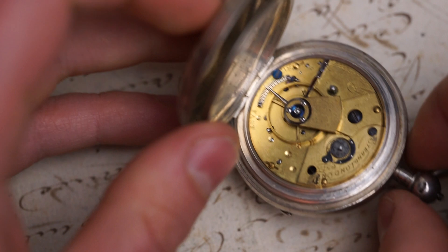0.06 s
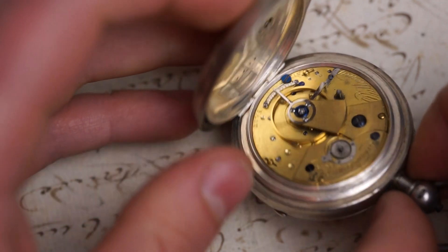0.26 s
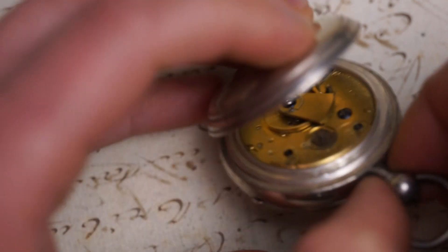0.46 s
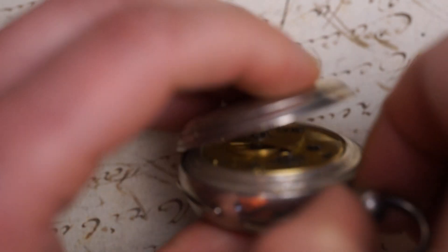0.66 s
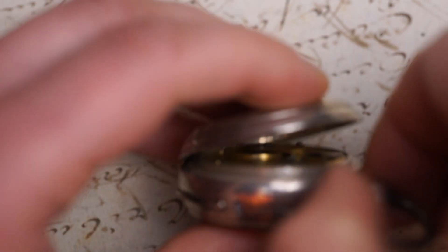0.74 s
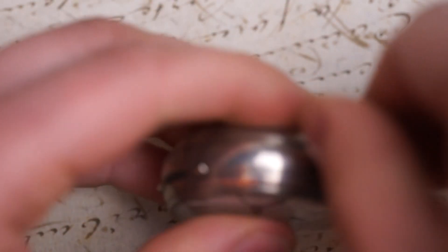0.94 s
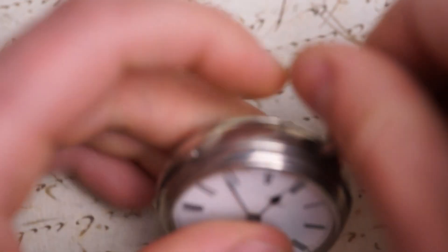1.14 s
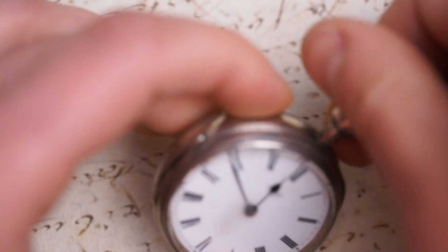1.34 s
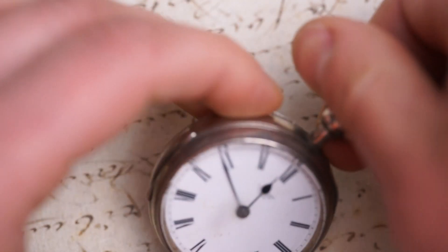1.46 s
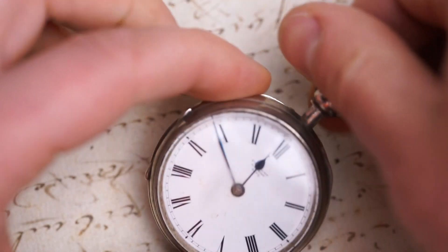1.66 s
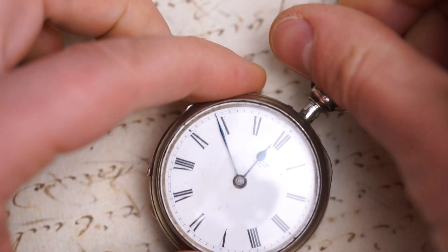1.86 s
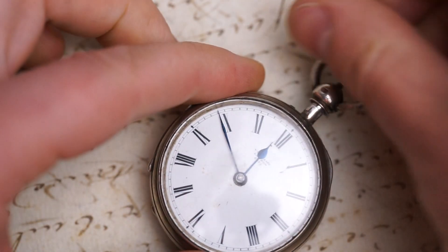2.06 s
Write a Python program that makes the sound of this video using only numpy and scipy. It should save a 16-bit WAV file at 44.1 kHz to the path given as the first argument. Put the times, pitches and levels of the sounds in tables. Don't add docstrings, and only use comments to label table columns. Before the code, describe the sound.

A metal pocket watch handled up close: one loud, bright lid snap with a short ring, then a lighter knock, a duller shutting click, and faint finger rubs and ticking in a quiet room.

```python
import sys
import numpy as np
from scipy import signal
from scipy.io import wavfile

SR = 44100
rng = np.random.default_rng(int(sys.argv[2]) if len(sys.argv) > 2 else 0)


def volts_from_decibels(level):
    exponent = np.asarray(level, float) / 20
    return 10 ** exponent


def master_out(mix):
    frames = np.transpose(np.atleast_2d(mix))
    ceiling = np.clip(frames, -1, 1)
    pcm = np.round(ceiling * 32767).astype(np.int16)
    wavfile.write(sys.argv[1], SR, pcm)


N = 92610


def rms_one(x):
    return x / np.sqrt(np.mean(x ** 2) + 1e-20)


def at_hz(points, hz):
    table_hz, values = np.array(points).T
    return np.interp(np.log(hz), np.log(table_hz), values)


def ring(push, hz, t60):
    radius = volts_from_decibels(-60 / (t60 * SR))
    angle = 2 * np.pi * hz / SR
    return signal.lfilter([0, np.sin(angle)], [1, -2 * radius * np.cos(angle), radius * radius], push + 1e-18)


def band(x, hz, octaves):
    edges = np.clip([hz * 2 ** (-octaves / 2), hz * 2 ** (octaves / 2)], 10, 0.45 * SR)
    return signal.sosfilt(signal.butter(2, edges, "band", fs=SR, output="sos"), x)


def add(out, start_s, sound, pan_db=0.0):
    first = int(start_s * SR)
    out[:, first:first + len(sound)] += volts_from_decibels([[pan_db / 2], [-pan_db / 2]]) * sound


# pitch_hz, likeness
LIKENESS_BY_HZ = [(30, 1), (125, 0.97), (290, 0.86), (640, 0.26), (1500, 0.12), (5000, 0.062),
                  (12000, 0.094)]


def noise_bands(gain_at):
    settle = 8000
    white = rng.standard_normal((2, 2, N + settle))
    edges = 16 * 2 ** np.arange(0, 10.3, 0.5)
    out = 0
    for k, low in enumerate(edges[:-1]):
        hz = low * 2 ** 0.25
        mid, side = band(white[k % 2], hz, 0.5)[:, settle:]
        alike = np.clip(at_hz(LIKENESS_BY_HZ, hz), -1, 1)
        stereo = np.sqrt(1 + alike) * mid + np.sqrt(1 - alike) * side * [[1], [-1]]
        out = out + gain_at(hz) * stereo
    return out


# pitch_hz, level_db
HISS_SPECTRUM = [(20, -13), (42, -8), (62, -10), (100, -5), (170, -11.5), (330, -11.5), (800, -20.5),
                 (2000, -23)]


def hiss():
    level_db, tilt_db_per_octave = -57.5, -2.07
    top_hz = HISS_SPECTRUM[-1][0]

    def gain_at(hz):
        octaves_above = max(0, np.log2(hz / top_hz))
        return volts_from_decibels(at_hz(HISS_SPECTRUM, hz) + tilt_db_per_octave * octaves_above)

    return volts_from_decibels(level_db) * rms_one(noise_bands(gain_at))


# middle_s, half_length_s, level_db, centre_hz, width_octaves
RUB_EVENTS = [
    (0.13, 0.079, -65.5, 1800, 2.3),
    (0.53, 0.047, -59.5, 1600, 3),
    (0.74, 0.058, -62, 7700, 3.8),
    (1.21, 0.041, -54, 4200, 2.24),
    (1.1, 0.013, -63.5, 7300, 1.8),
    (1.207, .04, -55.5, 11000, 1.1),
    (0.74, 0.025, -61, 1500, 0.55),
    (1.447, 0.036, -64.5, 6700, 1.75),
    (1.962, 0.044, -66, 6700, 1.1),
]


def rubs():
    grains_per_s = 4200
    t = np.arange(N) / SR
    out = np.zeros((2, N))
    for middle_s, half_s, db, hz, octaves in RUB_EVENTS:
        noise = rng.standard_normal((2, N))
        strength = volts_from_decibels(0.51 * np.minimum(rng.exponential(1, N), 3))
        slips = rng.random(N) < grains_per_s / SR
        grains = noise * (0.35 + strength * slips)
        grains = grains + 0.27 * grains.sum(axis=0)
        swell = np.exp(-((t - middle_s) / half_s) ** 2)
        out += volts_from_decibels(db) * rms_one(band(grains, hz, octaves)) * swell
    return out


# start_s, level_db, pitch_hz, t60_s
THUMP_EVENTS = [(0.077, -36, 110.5, 0.076), (0.169, -36.5, 120.8, 0.25), (0.189, -48.5, 245, 0.16),
                (0.212, -42.5, 131.3, 0.66), (.29, -34, 127.7, 0.13), (0.459, -48.5, 121.4, 0.35),
                (0.528, -42, 129, 0.093), (.945, -51.5, 104, 0.25), (1.1, -56, 103.7, 0.91),
                (1.361, -43, 100.7, 0.14), (1.671, -33.5, 121, 0.14), (1.937, -39, 127.6, 0.13),
                (2.051, -40.5, 118, 0.11)]


def thumps():
    rise_s = 0.019
    out, t = np.zeros((2, N + SR)), np.arange(SR // 2) / SR
    for start_s, db, hz, t60 in THUMP_EVENTS:
        envelope = volts_from_decibels(db - 60 * t / t60) * (1 - np.exp(-t / rise_s))
        add(out, start_s, envelope * np.sin(2 * np.pi * hz * t))
    return out[:, :N]


# start_s, level_db, centre_hz,
# fall_s
TICK_EVENTS = [(0.098, -51.5, 8000, 0.0036), (0.204, -34, 11500, .003), (.2040, -25, 6300, .003),
               (0.6568, -43.5, 10400, .003), (0.956, -44, 11000, .002), (0.378, -47, 5600, 0.0027),
               (.42, -48.5, 3960, 0.0015), (0.4791, -48, 7500, 0.0074), (0.479, -48, 12500, 0.0038),
               (.496, -51, 1780, 0.018), (0.516, -50, 2030, 0.0087), (0.543, -60, 3000, 0.0023),
               (.7502, -52, 6800, 0.0046), (.772, -52, 5500, .004), (.777, -52, 14000, .004),
               (.775, -52.5, 8800, .004), (.897, -55, 9000, 0.003), (1.157, -47, 6470, 0.0016),
               (1.173, -43, 4900, 0.0038), (1.1873, -34.5, 6000, 0.00047), (1.265, -50, 11000, 0.0042),
               (1.296, -54, 10000, 0.0049), (1.4791, -50, 7800, 0.0046), (1.4793, -53, 13200, 0.0025),
               (1.564, -53, 14000, 0.004), (1.707, -56.5, 2520, 0.0033), (1.764, -48.5, 10000, 0.0028),
               (1.897, -54, 4600, 0.0022), (1.897, -55, 10000, .002), (1.922, -50.5, 4500, 0.0025),
               (1.965, -51, 13500, 0.003), (2.098, -53, 10900, .003)]


def ticks():
    out, t = np.zeros((2, N + SR)), np.arange(1500) / SR
    for start_s, db, hz, fall_s in TICK_EVENTS:
        burst = rng.standard_normal(len(t)) * np.exp(-t / fall_s)
        sound = band(burst, hz, octaves=0.83)
        add(out, start_s, volts_from_decibels(db) * sound / np.abs(sound).max(), pan_db=-6)
    return out[:, :N]


# start_s, level_db, free_ring_share
BEAT_EVENTS = [
    (0.1585, -48, .6),
    (0.402, -51, 0.9),
    (0.657, -58, .9),
    (0.9103, -49, 0.93),
    (1.165, -58, .6),
    (1.4203, -50, .7),
    (1.694, -55, .45),
    (1.93, -52, .45),
]
# delay_s, level_db
BEAT_CONTACTS = [
    (0, -5.5),
    (.0035, -8),
    (.009, -14),
    (.019, -17),
]
# pitch_hz, level_db, t60_s
MOVEMENT_MODES = [(4400, -18, 0.096), (5600, -9, 0.066), (6800, -13, .03), (7800, -9, 0.04),
                  (8400, -16, 0.046), (9100, -13, 0.048), (9800, -10, 0.12), (9500, -3, 0.05),
                  (10400, -16, 0.04), (11070, -2.5, 0.083), (11500, -13, .05), (12300, -13, .03),
                  (13000, -10, .04)]


def escapement():
    grit_fall_s, grit_level, shade_db = 0.002, 0.13, 2.5
    out, t = np.zeros((2, N + SR)), np.arange(6000) / SR
    for start_s, beat_db, free in BEAT_EVENTS:
        for delay_s, contact_db in BEAT_CONTACTS:
            shades = rng.standard_normal(len(MOVEMENT_MODES))
            signs = rng.choice([-1, 1], len(MOVEMENT_MODES))
            grit = grit_level * rng.standard_normal(len(t)) * np.exp(-t / grit_fall_s)
            push = 0.5 * (t == 0) + grit
            rings = 0
            for (hz, mode_db, t60), shade, sign in zip(MOVEMENT_MODES, shades, signs):
                rings = rings + sign * volts_from_decibels(mode_db + shade_db * shade) * ring(push, hz, free * t60)
            crack = volts_from_decibels(21) * band(grit, 10000, octaves=1.3)
            add(out, start_s + delay_s, volts_from_decibels(beat_db + contact_db) * (rings + crack), pan_db=0.6)
    return out[:, :N]


def struck(contacts, body, grit_s, grit, low_hz):
    out, t = np.zeros((2, N + SR)), np.arange(2048) / SR
    no_bass = signal.butter(6, low_hz, "high", fs=SR, output="sos")
    for start_s, db, pan_db in contacts:
        push = (t == 0) + grit * rng.standard_normal(len(t)) * np.exp(-t / grit_s)
        shades_db = rng.standard_normal(len(body))
        sound = 0
        for k, ((hz, width_hz, mode_db), shade_db) in enumerate(zip(body, shades_db)):
            t60 = np.log(1000) / np.pi / width_hz
            sound = sound + volts_from_decibels(mode_db + shade_db) * (-1) ** k * width_hz * ring(push, hz, t60)
        sound = signal.sosfilt(no_bass, sound)
        add(out, start_s, volts_from_decibels(db) * sound / np.abs(sound).max(), pan_db)
    return out[:, :N]


def singing(modes, start_s):
    flutter_hz, flutter, rise_s = 89, 0.9, 0.00041
    t = np.maximum(np.arange(N) / SR - start_s, 0)
    low_pass = signal.butter(2, flutter_hz, fs=SR, output="sos")
    slow = flutter * rms_one(signal.sosfilt(low_pass, rng.standard_normal((len(modes), 2, N))))
    out = 0
    for (hz, db, t60, right), (swell, turn) in zip(modes, slow):
        envelope = volts_from_decibels(db - 60 * t / t60) * (1 - np.exp(-t / rise_s))
        phase = 2 * np.pi * hz * t
        line = (1 + swell) * np.sin(phase) + turn * np.cos(phase)
        out = out + envelope * [[1], [right]] * line
    return out


# start_s, level_db, left_over_right_db
LID_CONTACTS = [
    (0.2035, -11.5, -10),
    (0.2040, -11, 3),
    (0.2047, -8.5, -4.5),
    (0.2082, -33, -4),
]
# pitch_hz, width_hz, level_db
LID_BODY = [(1100, 180, -24), (1380, 300, -13.5), (1900, 290, -9), (2250, 271, 2), (3080, 208, 0.5),
            (4500, 320, -1), (4900, 170, 1), (5420, 200, -6.5), (6800, 210, -6), (7580, 560, -7.5),
            (8760, 330, -6.5), (10000, 780, -17), (13200, 470, -13), (15400, 1500, -20)]
# pitch_hz, level_db, t60_s, right_share_of_left
LID_LINES = [(8640, -23.5, 0.099, -0.53), (8520, -47, 0.12, -1.9), (7980, -50, .2, -0.93),
             (5580, -41, .25, 0.33), (5260, -49, 0.28, .5), (5100, -44.5, 0.18, -1.1),
             (4780, -41, 0.23, .5), (4417, -50, .25, -0.11), (3080, -42.5, 0.2, 0.41),
             (3067, -54, 0.16, -0.25), (2060, -42, 0.086, -0.79)]


def lid():
    snap = struck(LID_CONTACTS, LID_BODY, grit_s=0.0009, grit=0.14, low_hz=917)
    gap_hz, gap_octaves = 3790, 0.2
    edges = gap_hz * 2 ** (np.array([-0.5, 0.5]) * gap_octaves)
    snap = signal.sosfilt(signal.butter(2, edges, "stop", fs=SR, output="sos"), snap)
    return snap + singing(LID_LINES, start_s=0.2062)


# start_s, level_db, left_over_right_db
KNOCK_CONTACTS = [
    (0.6490, -48, 0.85),
    (0.6565, -29.5, 0.5),
    (0.6597, -36.5, 1),
    (0.6720, -49, 0.72),
    (0.6780, -48, 0.72),
    (0.6840, -46, 1),
    (.6905, -53, 1),
]
# pitch_hz, width_hz, level_db
KNOCK_BODY = [(1005, 220, 9), (1575, 190, 12.5), (2430, 170, 11.5), (3640, 770, -1), (4200, 620, -3),
              (5200, 250, 4), (7950, 2300, -11.5), (9500, 1300, -13), (11500, 1500, -17),
              (12360, 1300, -17)]


def table_knock():
    return struck(KNOCK_CONTACTS, KNOCK_BODY, grit_s=0.0027, grit=0.33, low_hz=735)


# pitch_hz, level_db, t60_s, right_share_of_left
CASE_LINES = [(4330, -63.5, 0.53, 1), (5700, -62.5, 0.38, 0.58), (9000, -65.5, 0.42, .9),
              (9560, -67, 0.25, 0.77), (10800, -67, 0.31, .9), (11400, -66, .4, .9), (13110, -69, .3, .9)]


def case_ring():
    return singing(CASE_LINES, start_s=0.658)


# start_s, level_db, left_over_right_db
SHUT_CONTACTS = [
    (0.9564, -47, .1),
    (0.9569, -30, .1),
    (0.9595, -38, .1),
    (0.9608, -39, .1),
    (0.9630, -46, 0.1),
    (0.9800, -49, .1),
]
# pitch_hz, width_hz, level_db
SHUT_BODY = [(296, 140, 4), (580, 300, 3), (980, 450, 2), (1730, 530, -1), (3200, 470, -0.5),
             (5340, 570, 2), (8500, 820, -7.5), (10000, 1100, -12), (12500, 2000, -19), (15400, 1300, -21)]


def case_shut():
    return struck(SHUT_CONTACTS, SHUT_BODY, grit_s=0.0019, grit=0.16, low_hz=168)


# start_s, level_db, left_over_right_db
SOFT_CONTACTS = [
    (1.1380, -47, .1),
    (1.1420, -42.5, .1),
    (1.2985, -48.5, 0.11),
]
# pitch_hz, width_hz, level_db
SOFT_BODY = [(480, 150, -0.5), (796, 96, 4.5), (1900, 670, -5.5), (6000, 4800, -19)]


def soft_knocks():
    return struck(SOFT_CONTACTS, SOFT_BODY, grit_s=0.0026, grit=0.15, low_hz=350)


# start_s, level_db, left_over_right_db
CROWN_CONTACTS = [
    (1.9470, -46, -.4),
    (1.9500, -41, -.4),
    (2.0445, -48.5, -0.48),
]
# pitch_hz, width_hz, level_db
CROWN_BODY = [(1120, 210, 1), (1530, 200, -6), (1770, 160, -0.5), (2170, 320, 2.5), (2720, 220, -11),
              (3170, 300, -3), (4050, 260, -8)]


def crown_taps():
    return struck(CROWN_CONTACTS, CROWN_BODY, grit_s=0.0023, grit=0.82, low_hz=880)


# pitch_hz, t60_s
ROOM_DECAY = [(500, 1), (2000, 0.3), (5000, 0.44), (9000, 0.44), (15000, 0.39)]


def room(x):
    level_db, gap_s, early_db, early_s = -7, 0.0027, 19, 0.01
    t = np.arange(N) / SR

    def gain_at(hz):
        decay_db = -60 * t / at_hz(ROOM_DECAY, hz)
        return volts_from_decibels(decay_db + early_db * np.exp(-t / early_s)) * (t > gap_s)

    tail = noise_bands(gain_at)
    tail = tail / np.sqrt(np.mean(np.sum(tail ** 2, axis=1)))
    source = x[1][None]
    return volts_from_decibels(level_db) * signal.fftconvolve(source, tail, axes=1)[:, :N]


def scene():
    watch = lid() + table_knock() + case_shut() + crown_taps() + soft_knocks() + case_ring() + escapement()
    hands = ticks() + rubs()
    near = watch + hands
    background = hiss()
    return near + room(near) + thumps() + background


def band_limit(x):
    return signal.sosfilt(signal.butter(12, 16660, fs=SR, output="sos"), x)


def record(dry):
    low_pass = signal.cheby2(18, 30, 15950, fs=SR, output="sos")
    mix = signal.sosfiltfilt(low_pass, dry)
    return band_limit(mix)


dry = scene()
out = record(dry)
master_out(out)
```